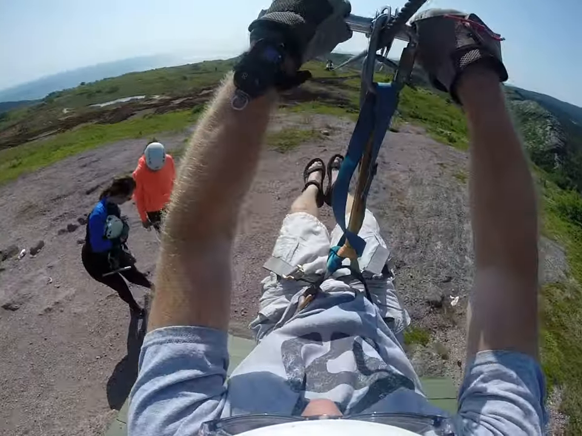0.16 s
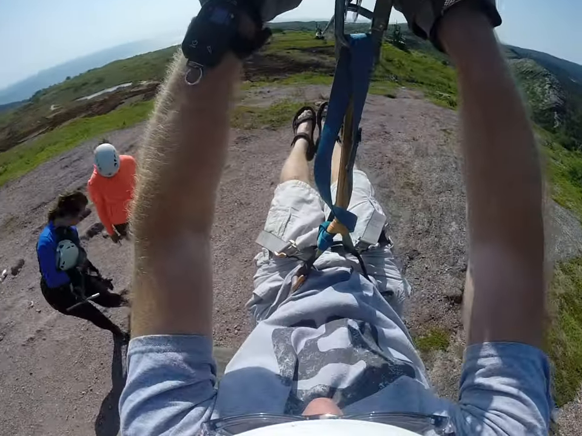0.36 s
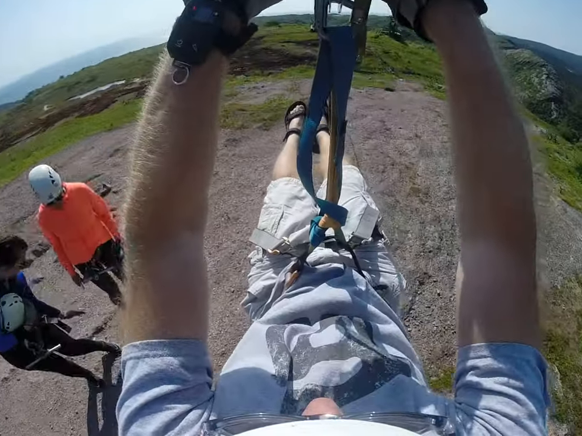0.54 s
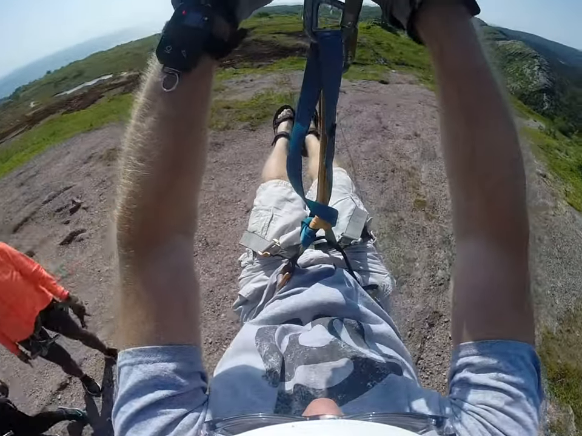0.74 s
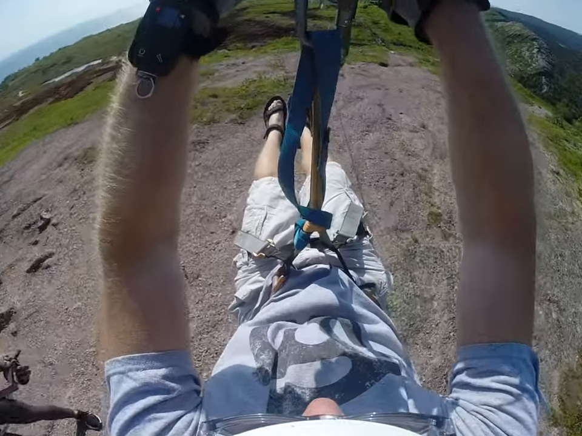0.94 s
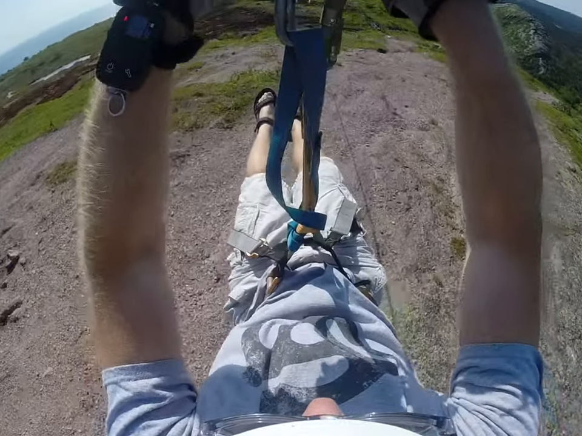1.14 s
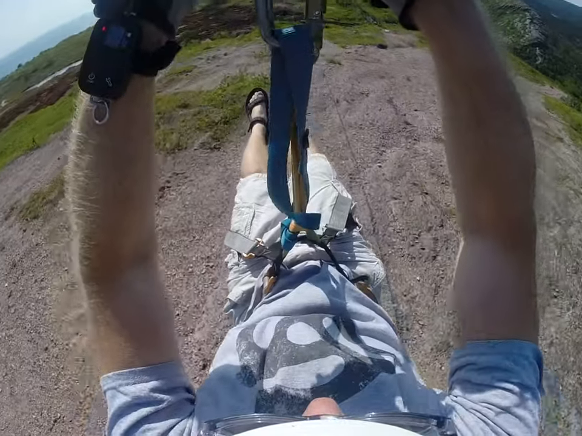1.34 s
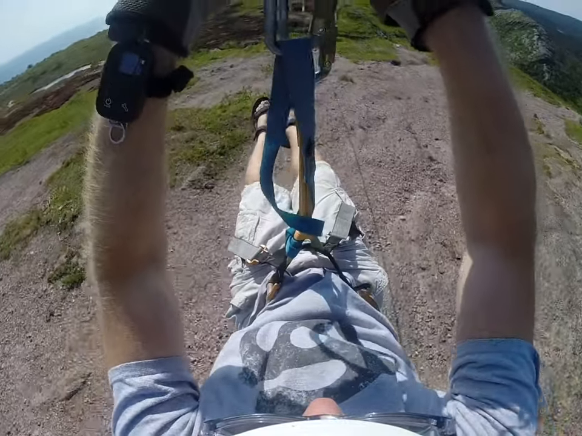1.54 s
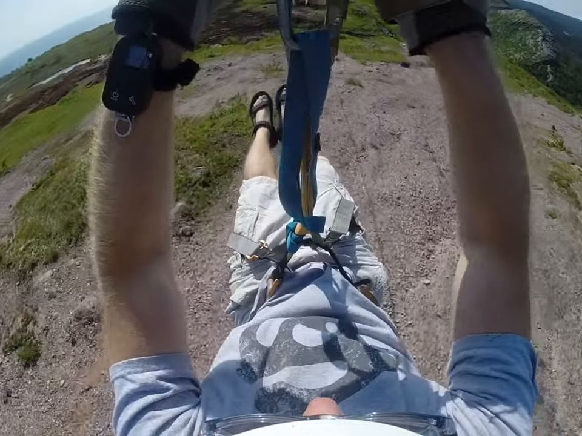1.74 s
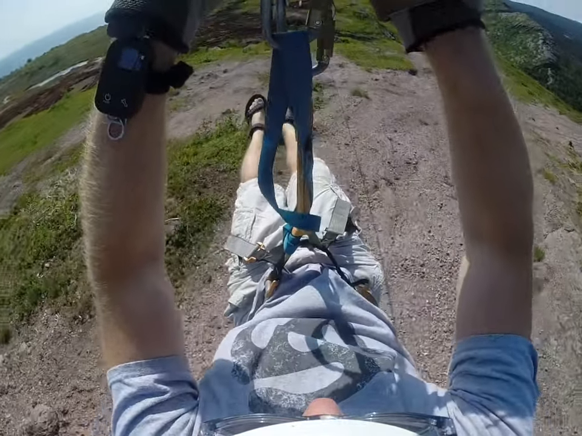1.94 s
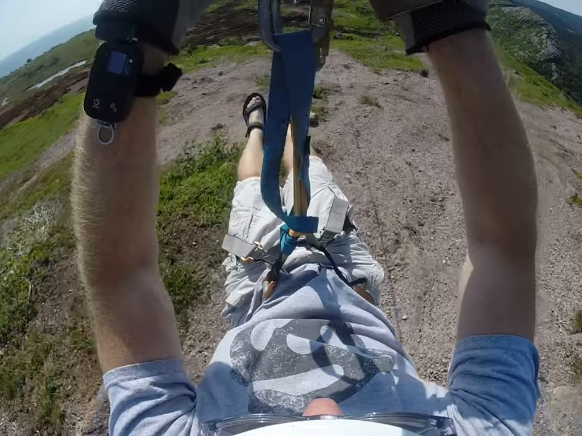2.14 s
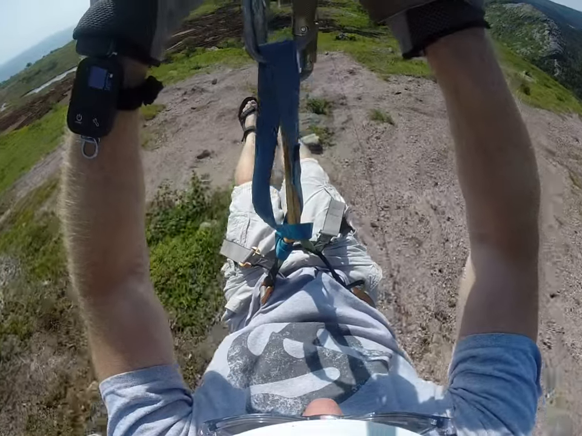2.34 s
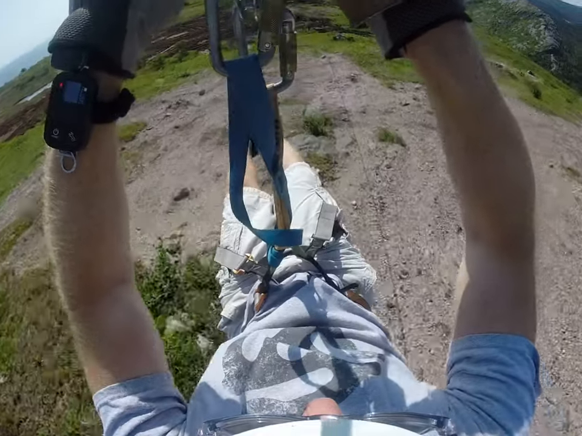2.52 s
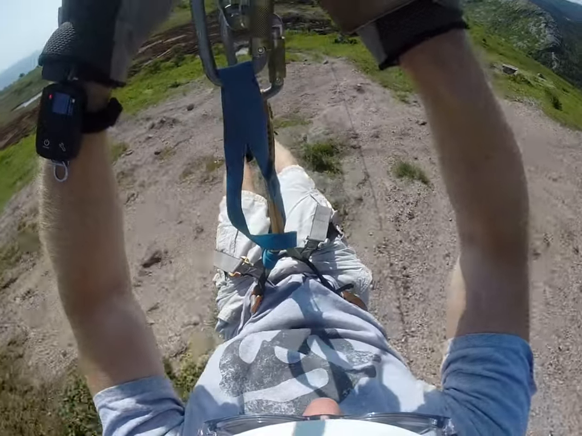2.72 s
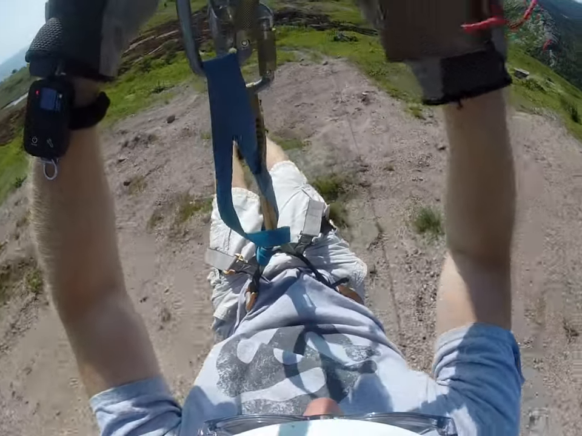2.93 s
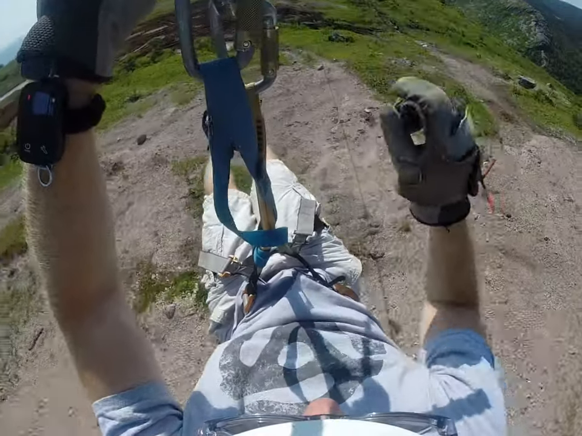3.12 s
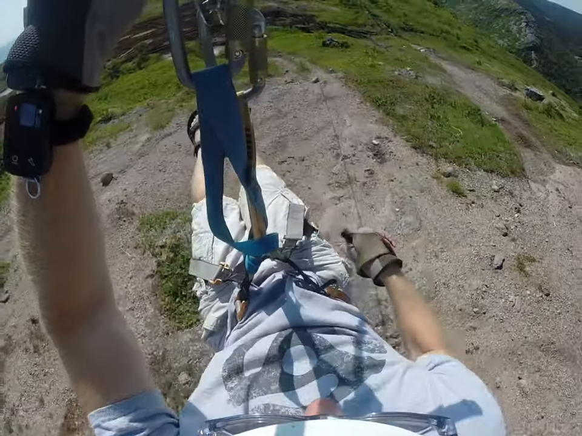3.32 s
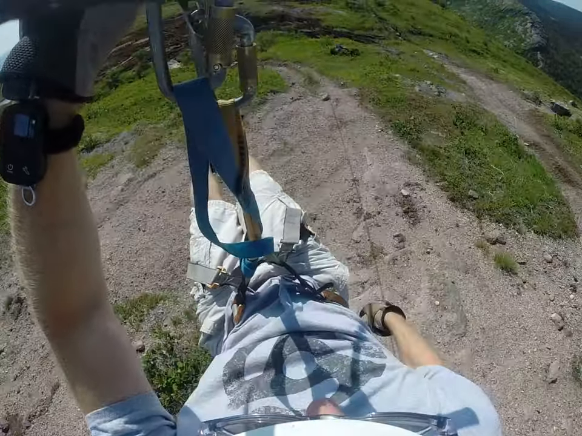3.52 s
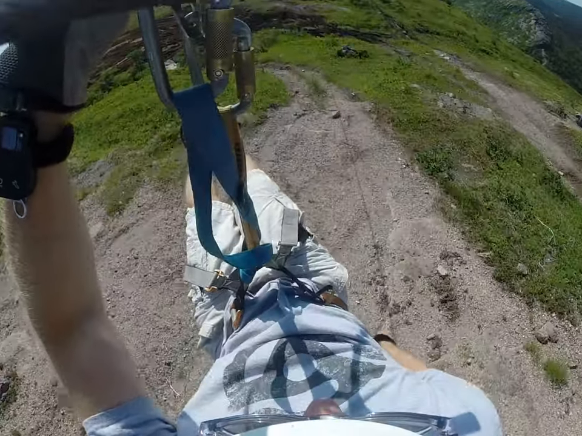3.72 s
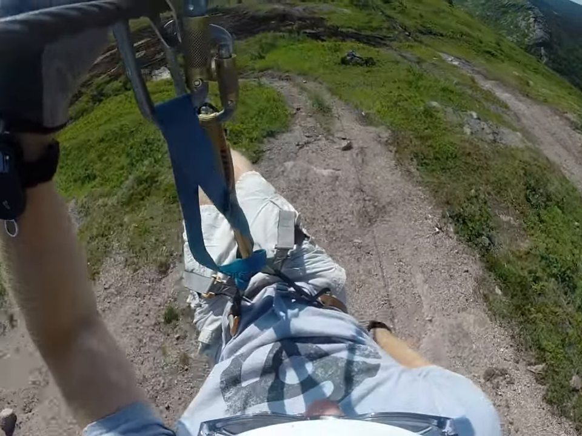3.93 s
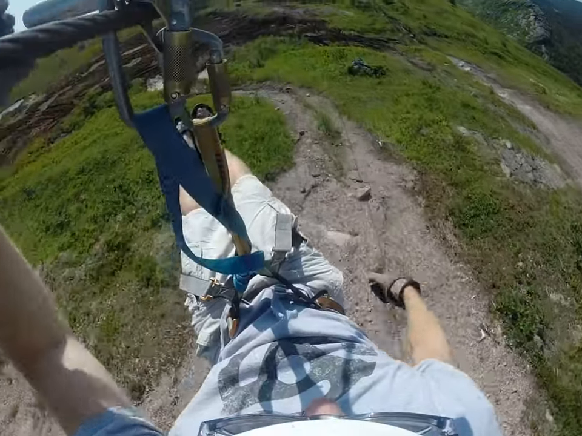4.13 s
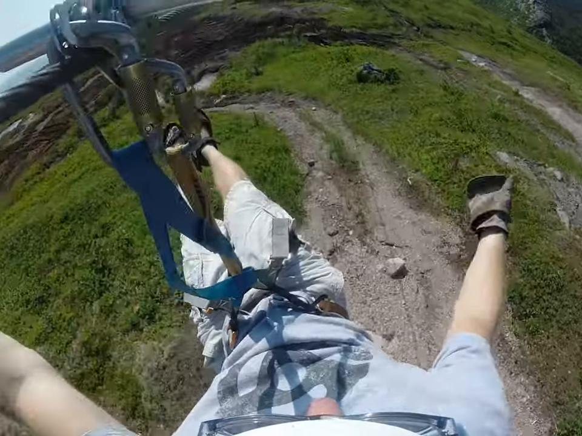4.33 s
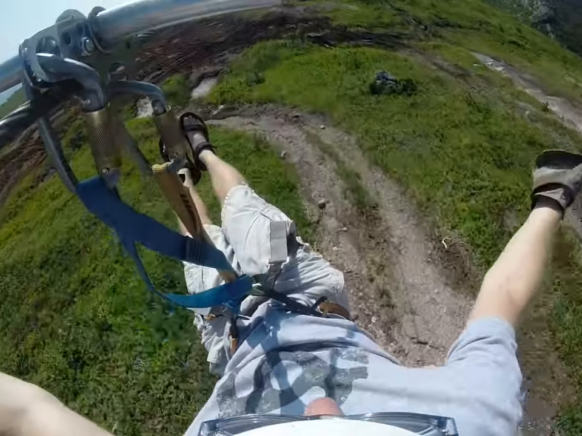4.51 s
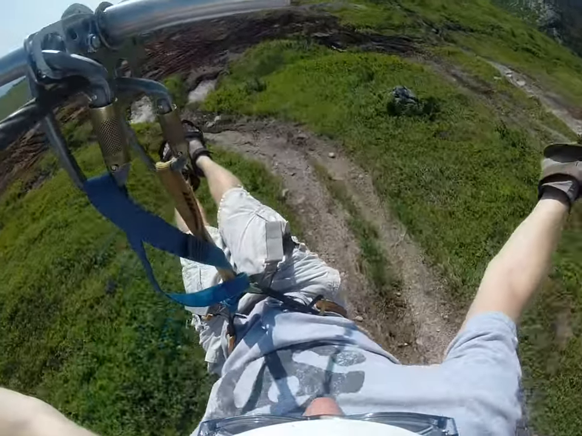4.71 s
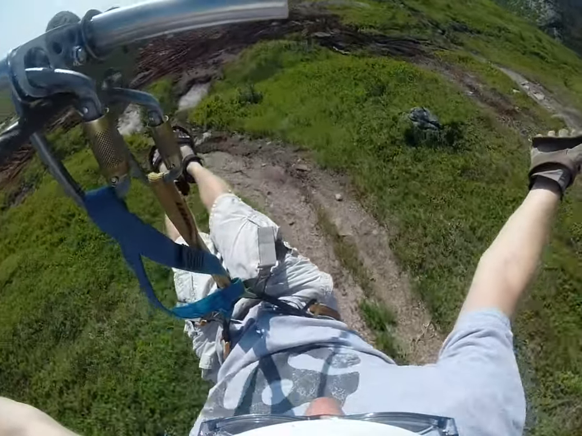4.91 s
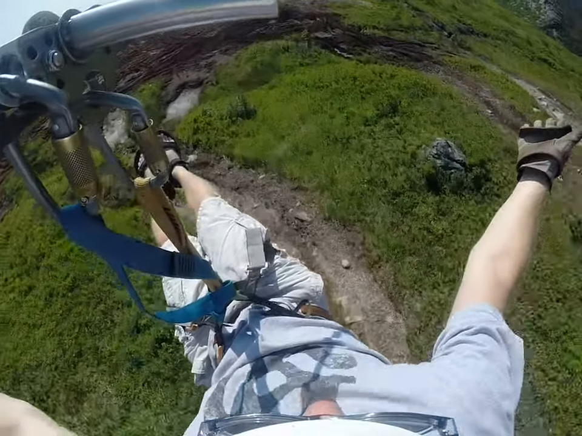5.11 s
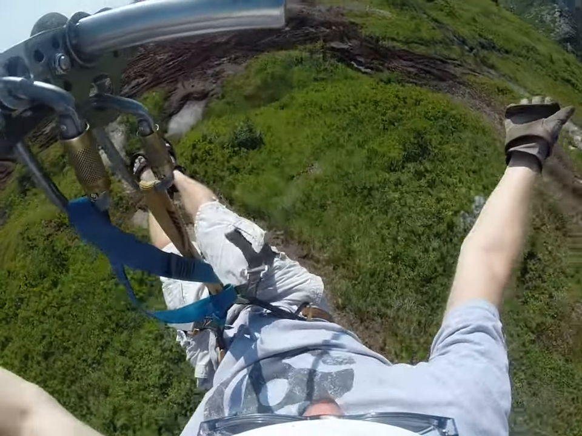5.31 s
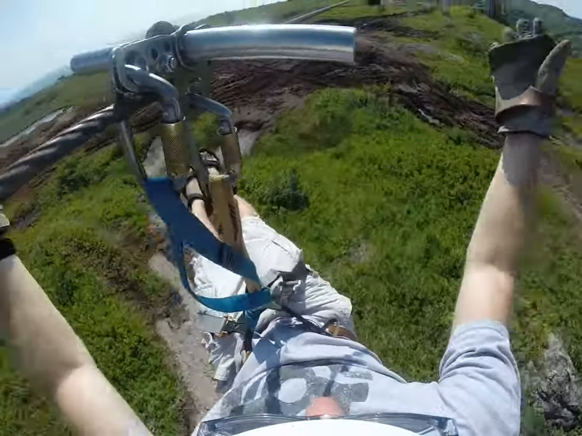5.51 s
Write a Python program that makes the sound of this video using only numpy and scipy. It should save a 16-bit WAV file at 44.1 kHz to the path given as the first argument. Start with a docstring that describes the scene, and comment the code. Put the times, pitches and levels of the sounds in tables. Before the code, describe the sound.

A zip line trolley rolls off along a steel cable, its metallic hiss growing louder and its whine climbing in pitch. Near the start the harness knocks and creaks. Past halfway the handlebar sings with a thin, high tone, ending in a glove's brief squeaky slide, and a shackle clacks. Wind buffets the helmet microphone outdoors, getting stronger toward the end.

```python
"""A hiss and a rising whine, with an early knock and creak of harness: a zip line ride, from the helmet.
The trolley's sheaves gather speed over the strands of a steel cable and ring the frame, whose colour
changes as first one hand, then the other, lets go. The handlebar sings while it hangs from one hand,
until that glove slips off too. Underneath, a growing wind buffets the microphone and booms in the helmet."""
import sys
import numpy as np
from scipy import signal
from scipy.fft import rfft, irfft, next_fast_len
from scipy.io import wavfile
from scipy.ndimage import map_coordinates

SR = 44100
rng = np.random.default_rng(int(sys.argv[2]) if len(sys.argv) > 2 else 0)


def store_pcm(level_fs):
    """Save levels as 16-bit WAV."""
    pcm = np.round(np.clip(level_fs, -1, 1) * 32767).astype(np.int16)
    wavfile.write(sys.argv[1], SR, np.atleast_2d(pcm).T)


N = 245195

# travel speed along the cable: time_s, strands_per_s
SPEED = [(0, 125), (.5, 200), (1, 255), (1.3, 278), (1.8, 316), (2.3, 350), (2.7, 376), (3, 397),
         (3.4, 424), (4, 450), (4.6, 478), (5, 495), (5.56, 512)]


def amp(db):
    """Decibels to gain."""
    return 10 ** (np.asarray(db) / 20)


def unit(x):
    """Scale to rms 1."""
    return x / np.sqrt(np.mean(x ** 2) + 1e-20)


def along(points, hz):
    """Read (freq_hz, value) points on a log axis."""
    freqs, values = np.transpose(points)
    return np.interp(np.log(hz + 1), np.log(freqs + 1), values)


def curves(rows):
    """One value per sample for each column after time_s."""
    times, *columns = np.transpose(rows)
    return [np.interp(np.arange(N) / SR, times, column) for column in columns]


def wobble(rate):
    """A smooth random curve, rate knots a second."""
    return map_coordinates(rng.standard_normal(int(N * rate / SR) + 4), [np.arange(N) * rate / SR])


def envelope(start_s, attack_s, hold_s, release_s):
    """Level in dB: climbs 28 dB over the attack, holds at 0, then falls 28 dB per release time."""
    t = np.arange(N) / SR - start_s
    return -28 * (np.maximum(1 - t / attack_s, 0) + np.maximum((t - attack_s - hold_s) / release_s, 0))


def swells(rows):
    """Smooth bumps from (centre_s, length_s, boost_db, ...) rows: one curve per dB column."""
    centre, length, *boosts = np.transpose(rows)
    offset = np.clip((np.arange(N) / SR - centre[:, None]) / length[:, None], -.5, .5)
    return np.array(boosts) @ np.cos(np.pi * offset) ** 2


def filtered(x, response):
    """Shape x with a gain that depends on frequency."""
    size = next_fast_len(N + SR // 4)
    return irfft(rfft(x, size) * response(np.fft.rfftfreq(size, 1 / SR)), size)[:N]


def noise(spectrum):
    """Coloured noise at rms 1."""
    return unit(filtered(rng.standard_normal(N), lambda hz: amp(along(spectrum, hz))))


def peaks(modes, hz):
    """Power response of steep-sided resonances: pitch_hz, width_hz, level_db."""
    return sum(amp(2 * db) / (1 + (2 * (hz - centre) / width) ** 2) ** 2 for centre, width, db in modes)


def resonate(force, modes):
    """A force rings a set of resonances, at rms 1."""
    return unit(filtered(force, lambda hz: np.sqrt(peaks(modes, hz))))


def rubbed(modes, grain_db):
    """Friction: quick uneven slips ring a few resonances."""
    slips = rng.standard_normal(N) * amp(grain_db * wobble(250))
    return resonate(slips, modes)


def wind():
    """One wind drives three layers: eddies on the microphone, a boom in the helmet and a soft rush."""
    # wind strength at the helmet: time_s, rush_db
    strength = [(0, -61), (.28, -62.5), (.45, -56), (3.1, -56.5), (3.7, -50.5), (4.35, -52), (5.0, -45),
                (5.56, -45.5)]
    # gusts: centre_s, length_s, buffet_db, rush_and_boom_db
    gusts = [(.68, 0.17, 10, 2), (.94, 0.19, 4.5, 3), (1.42, 0.34, 9, -2), (1.72, 0.56, 7.5, -1.5),
             (2.15, 0.37, 6, 3.5), (2.67, 0.11, 1, 4), (3.85, 0.086, -8, 6), (4.2, 0.075, 7, 3),
             (5.04, 0.27, 0, 2)]
    # colours of the eddies and of the rushing air: freq_hz, level_db
    buffet_colour = [(8, -9), (15, 7), (28, -5), (42, -2.5), (54, 2), (64, -10.5), (78, -12.5), (120, -55)]
    rush_colour = [(80, -35), (135, -1), (170, -5), (205, -1.5), (300, -10.5), (600, -14.5), (1500, -14),
                   (5000, -52)]
    # hollow resonance of the shell: pitch_hz, width_hz, level_db
    helmet_modes = [(93.6, 50, 0)]
    wind_db, = curves(strength)
    eddy_db, gust_db = swells(gusts)
    rise_db = wind_db - wind_db.mean()
    buffet = amp(-39.5 + 0.48 * rise_db + eddy_db) * noise(buffet_colour)
    shell = resonate(rng.standard_normal(N), helmet_modes)
    boom = amp(-49.5 + 0.85 * rise_db + gust_db + wobble(9)) * shell
    rush = amp(wind_db + gust_db + 0.6 * wobble(20)) * noise(rush_colour)
    return buffet + boom + rush


def harness():
    """Shackles knock and thump; the sling creaks in quick slips as it takes the weight."""
    # hardware knocks: start_s, ring_db, thump_db
    knocks = [(.355, -52, -55), (.400, -42, -30), (0.408, -49, -33.5), (4.474, -33.5, -46),
              (4.479, -44, -48)]
    # ring of a shackle: pitch_hz, level_db, t60_s
    shackle_modes = [(450, -15, .025), (910, -16, 0.048), (1010, 13.5, 0.0081), (1380, 4, 0.022),
                     (1770, 7, 0.031)]
    # resonances of the webbing: pitch_hz, width_hz, level_db
    sling_modes = [(1580, 110, -3), (1800, 110, 3), (2000, 170, -5), (2320, 180, -11)]
    hardware = np.zeros(N + SR)
    t = np.arange(SR // 6) / SR
    thump = amp(-60 * t / 0.06) * np.sin(2 * np.pi * 100 * t)
    attack = 1 - np.exp(-t / 0.00064)
    for start_s, ring_db, thump_db in knocks:
        ring = np.zeros(len(t))
        for hz, level_db, t60_s in shackle_modes:
            decay = amp(level_db + rng.normal(0, 1.4) - 60 * t / t60_s)
            ring += decay * np.sin(2 * np.pi * (hz * t + rng.random()))
        hardware[round(start_s * SR):][:len(t)] += (amp(ring_db) * ring + amp(thump_db) * thump) * attack
    creak_db = -38.5 + envelope(start_s=0.407, attack_s=0.029, hold_s=0.04, release_s=0.24)
    return hardware[:N] + amp(creak_db) * rubbed(sling_modes, grain_db=4.0)


def handlebar():
    """The bar's free end sings while it hangs from one hand; that glove rubs harder, then slips off."""
    # flare-ups of the singing: centre_s, length_s, boost_db
    flares = [(3.21, .1, 6), (3.38, 0.088, 7), (3.48, 0.086, 11), (3.565, .08, 10.5), (3.81, 0.037, 9),
              (4.0, 0.14, 10), (4.1, 0.11, 8)]
    # resonances under the sliding glove: pitch_hz, width_hz, level_db
    bar_modes = [(6480, 140, 2), (6670, 280, -3), (7130, 180, 0)]
    sing_hz = 7075
    sing_db = -37.5 + envelope(start_s=2.75, attack_s=0.25, hold_s=1.38, release_s=0.1)
    flare_db, = swells(flares)
    phase = 2 * np.pi * sing_hz * np.arange(N) / SR + 0.85 * wobble(45)
    sing = amp(sing_db + flare_db + 1.3 * wobble(25.5)) * unit(np.sin(phase))
    slide_db = -27.5 + envelope(start_s=3.68, attack_s=0.399, hold_s=0.027, release_s=0.08)
    return sing + amp(slide_db) * rubbed(bar_modes, grain_db=3.0)


def whine(strands):
    """Strands pass under the sheaves as rising tones that swell where the cable radiates well."""
    # strand tones: multiple_of_strand_rate, level_db
    harmonics = [(1, 0), (2, -2.5), (3, -0.5), (4, -2), (5, -9)]
    # how well the taut cable radiates: freq_hz, gain_db
    radiation = [(250, -37), (430, -34), (560, -58), (730, -47), (790, -23), (860, -25), (930, -28),
                 (1000, -28), (1120, -37), (1220, -30), (1300, -18.5), (1400, -32), (1520, -26),
                 (1650, -7.5), (1900, -36), (2130, -26), (2400, -43)]
    speed, = curves(SPEED)
    drive_db = -25.5 - 37 * np.exp((speed[0] - speed) / 130)  # grows with speed and levels off
    tones = np.zeros(N)
    for multiple, db in harmonics:
        level_db = drive_db + db + along(radiation, multiple * speed) + 2.1 * wobble(14)
        tones += amp(level_db) * np.sin(2 * np.pi * multiple * strands + 1.6 * wobble(35))
    return tones


def contact(turns, pattern_db, flutter_db, throb_db, scuff_decay_s, scatter_db):
    """Force under the rolling sheaves, as a smooth hiss and a spikier grit."""
    # how hard the sheave bites at each speed: strands_per_s, depth_db
    bite_depth = [(150, -11), (230, -1.5), (320, -3.5), (400, -7), (500, -11.5)]
    # the worn groove repeats its bumps every turn, fading in and out as the sheave wanders
    groove = rng.standard_normal(80)
    pattern = map_coordinates(groove, [turns % 1 * len(groove)], mode="grid-wrap", order=3)
    pattern *= 1 + .5 * wobble(6)
    # about once a turn the sheave bites: a sudden scuff of uneven strength
    bites = np.diff(np.floor(turns + .1 * wobble(40)), prepend=0) > 0
    strength = amp(scatter_db * np.tanh(wobble(70)))
    decay = np.exp(-np.arange(SR // 25) / (scuff_decay_s * SR))
    scuffs = unit(signal.fftconvolve(bites * strength, decay)[:N])
    depth = amp(2 * along(bite_depth, curves(SPEED)[0]))
    scuff_power = (1 + depth * scuffs ** 2) / (1 + depth)
    flutter = unit(wobble(35) + wobble(110) + wobble(400))
    pressure_db = flutter_db * flutter + throb_db * np.sin(2 * np.pi * turns)
    force = amp(pressure_db) * np.sqrt(scuff_power)
    hiss = unit(rng.standard_normal(N) * force ** 0.39)  # compressed, so smoother than the grit
    grit = unit(rng.standard_normal(N) * force * amp(0.39 * wobble(35)))
    return hiss + amp(pattern_db) * unit(pattern), grit


def trolley(turns):
    """The rolling contact rings the frame, louder with speed; each grip damps different resonances."""
    # the rider letting go of the bar: time_s, hands_off (about 0 to 2)
    letting_go = [(0, 0.32), (1.6, 0.068), (2.8, 0.48), (3.05, 0.78), (3.3, 0.82), (4.05, 1.4), (4.2, 1.94),
                  (4.45, 2.145)]
    # broad colour of steel rolling on steel: freq_hz, level_db
    roll_colour = [(100, -17.5), (450, -20.5), (1180, -16.5), (1450, -8.5), (2000, -2.5), (2600, -3),
                   (4300, 0), (5400, 0), (6800, -3.5), (7900, -6.5), (8300, -11.5), (9900, -15.5),
                   (10800, -18), (13000, -21), (14100, -22), (15200, -22.5)]
    # frame resonances over that colour: pitch_hz, width_hz, two_hands_db, one_hand_db, no_hands_db
    frame_modes = [(1312, 31, 7, 19, -16), (1465, 114, 3, 5.5, -6), (1637, 140, 5, 13, 7.5),
                   (1830, 69, -8, 10.5, 7), (2117, 102, -3, 16.5, 17.5), (2270, 170, 6, 4, 11.5),
                   (2485, 200, 6, 5, 1.5), (2739, 90, 21, 18, 19.5), (2902, 214, 22, 24, 21),
                   (3130, 220, -14, 7.5, 12), (3390, 81, -2, -8, 16), (3515, 115, 9, 8, 16.5),
                   (3990, 790, 2, 3, 3), (4586, 450, 4.5, 3, 9.5), (4776, 250, -4, 11.5, 14.5),
                   (5140, 400, 12, 15, 11), (5502, 280, 4, 12, 13.5), (6034, 290, 11.5, 9, 8),
                   (6610, 440, 3, 7.5, 12.5), (7079, 99, -1, 18.5, 8), (7410, 410, 10, 5, 12.5),
                   (8635, 67, 13, 7, 15.5), (9180, 210, 11, 11.5, 4), (10220, 330, 2, 7.5, 1),
                   (11800, 130, -12, 12, 8), (11930, 80, -7, 16, 15), (12700, 260, 4, 5, 10),
                   (12950, 260, 15, 6, 7), (13780, 330, 12, 1, 8)]
    # growl, sheave ring, hiss, grit and fizz; each starts short of full level and closes in with speed:
    # full_db, shortfall_db, speed_scale_strands_per_s, one_hand_db, no_hands_db
    bands = [(-31.5, 37.5, 130, .5, -0.8), (-29, 34.5, 86.6, -7, -1.5), (-24.5, 44, 108, 1, 0.5),
             (-38.5, 41, 106, -2, 1), (-42, 53, 109, 0.5, 0.5)]
    # borders of those five bands: edge_hz
    edges = [0, 2630, 3130, 8000, 11000, 22050]
    # the trolley rocks and scrapes harder: centre_s, length_s, ring_db, growl_and_hiss_db, grit_and_fizz_db
    jolts = [(.74, 0.28, 0.5, 0.5, 3), (1.08, 0.14, 0, 2, .5), (1.74, .22, -1.5, 1, 3.5),
             (2.55, 0.21, 2, 0.5, 0.5), (2.93, 0.12, 3, 0.5, 1), (3.13, 0.074, 6, 0, 0),
             (4.17, 0.1, 4, 1, 2), (4.31, 0.24, 2, .5, 0), (5.08, 0.37, 2.5, 1, 0.5),
             (5.36, 0.28, 4, 1.5, 0.5), (5.53, 0.38, 3, 2, 2)]
    hiss, grit = contact(turns, pattern_db=-12, flutter_db=1.5, throb_db=1.5,
                         scuff_decay_s=0.0028, scatter_db=6.0)
    speed, = curves(SPEED)
    hands_off, = curves(letting_go)
    ring_jolt, hiss_jolt, grit_jolt = swells(jolts)
    size = next_fast_len(N + SR // 4)
    hz = np.fft.rfftfreq(size, 1 / SR)
    drive_spectra = [rfft(hiss, size)] * 3 + [rfft(grit, size)] * 2
    band_jolts = [hiss_jolt, ring_jolt, hiss_jolt, grit_jolt, grit_jolt]
    out = np.zeros(N)
    for grip in range(3):  # two hands, one, none
        modes = [(centre, width, dbs[grip]) for centre, width, *dbs in frame_modes]
        frame = amp(along(roll_colour, hz)) * np.sqrt(1 + peaks(modes, hz))
        crossfade = np.clip(1 - abs(hands_off - grip), 0, 1)
        for band, drive, jolt_db, low, high in zip(bands, drive_spectra, band_jolts, edges, edges[1:]):
            full_db, shortfall_db, speed_scale, one_hand_db, no_hands_db = band
            level_db = full_db - shortfall_db * np.exp((speed[0] - speed) / speed_scale)
            grip_db = (0, one_hand_db, no_hands_db)[grip]
            rolling = unit(irfft(drive * frame * (hz >= low) * (hz < high), size)[:N])
            out += crossfade * amp(level_db + jolt_db + grip_db) * rolling
    return out


def scene():
    """A mono mix: every source rides along with the microphone."""
    strands = np.cumsum(curves(SPEED)[0]) / SR
    turns = strands / 6  # six strands per turn of a sheave
    return (trolley(turns) + whine(strands) + handlebar() + harness() + wind())[None]


def record(dry):
    """The camera keeps nothing above its band limit."""
    top_hz = 15330
    return filtered(dry[0], lambda hz: hz < top_hz)[None]


dry = scene()
out = record(dry)
store_pcm(out)
```